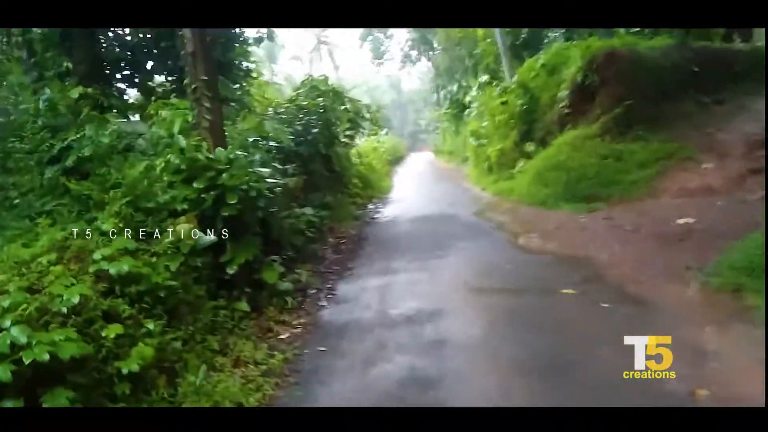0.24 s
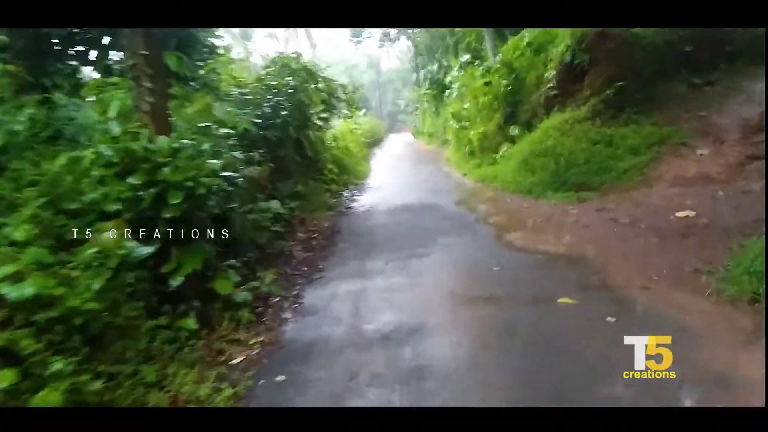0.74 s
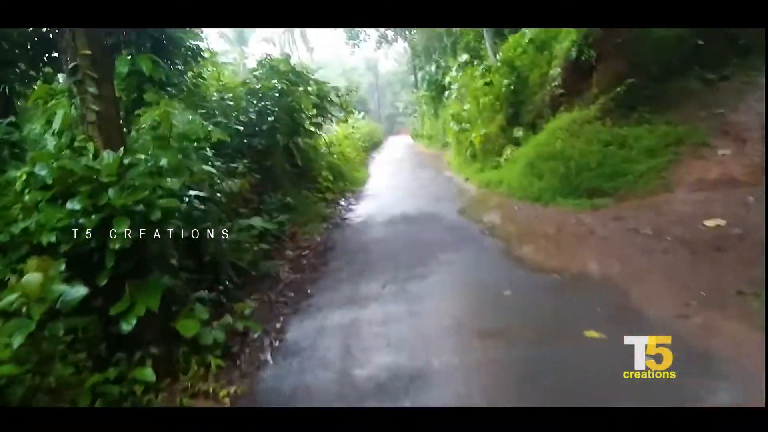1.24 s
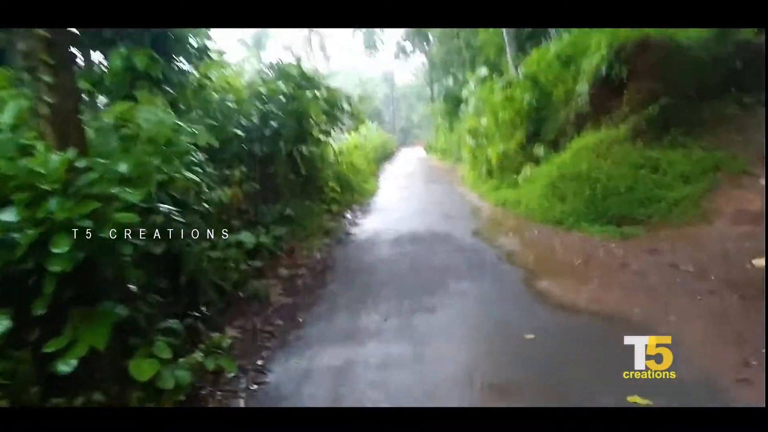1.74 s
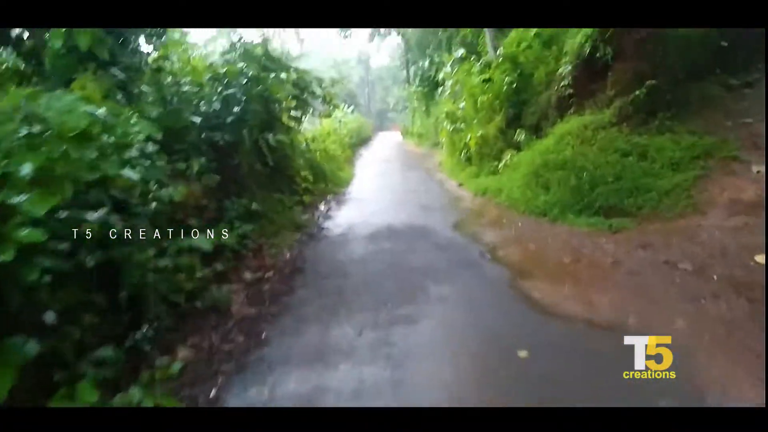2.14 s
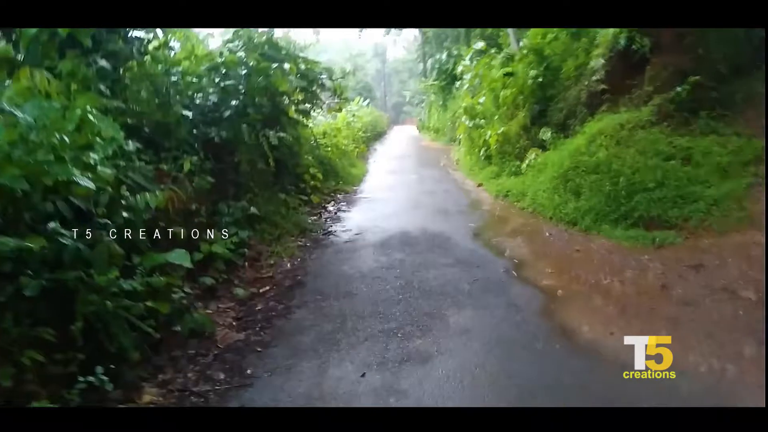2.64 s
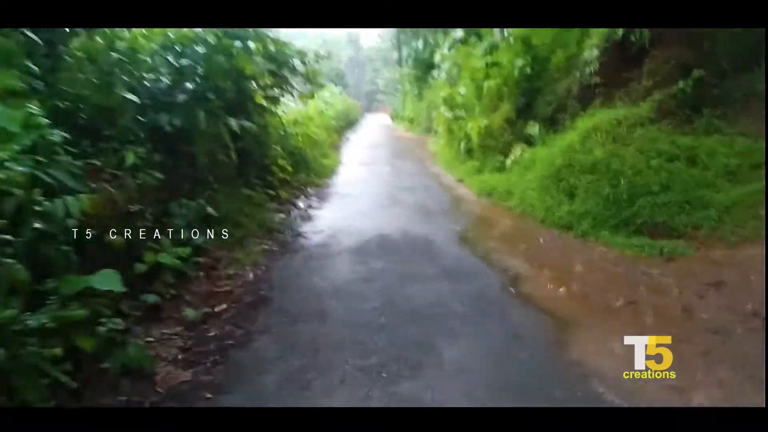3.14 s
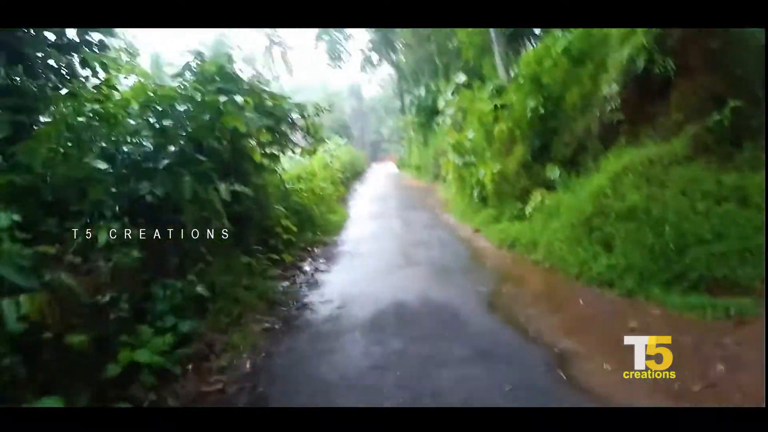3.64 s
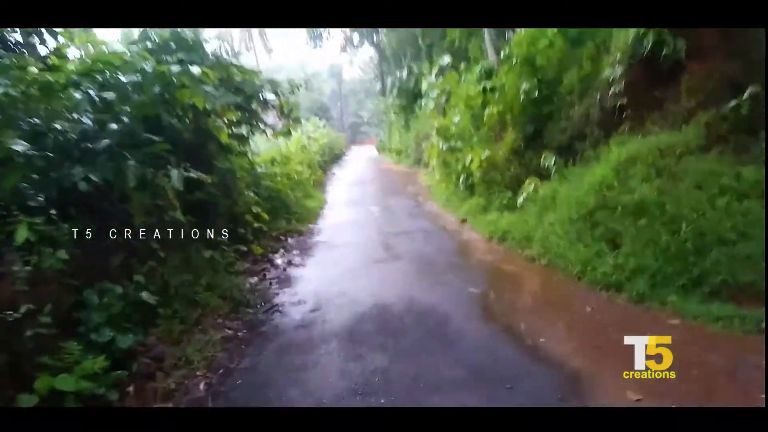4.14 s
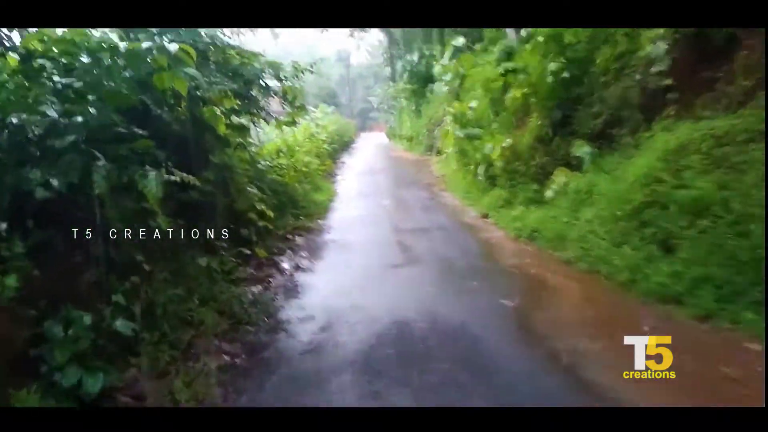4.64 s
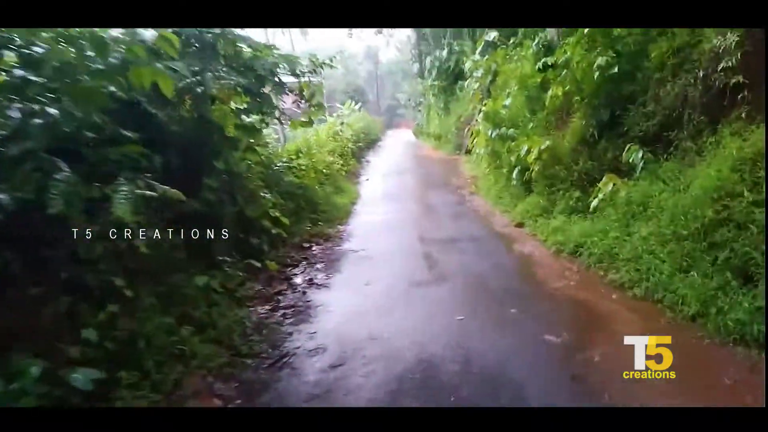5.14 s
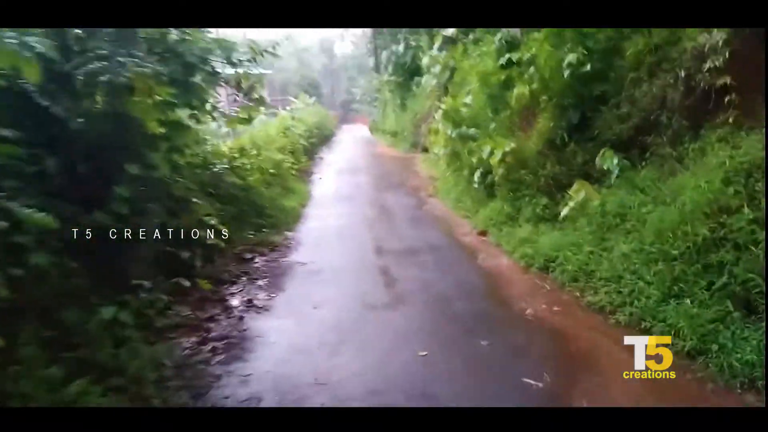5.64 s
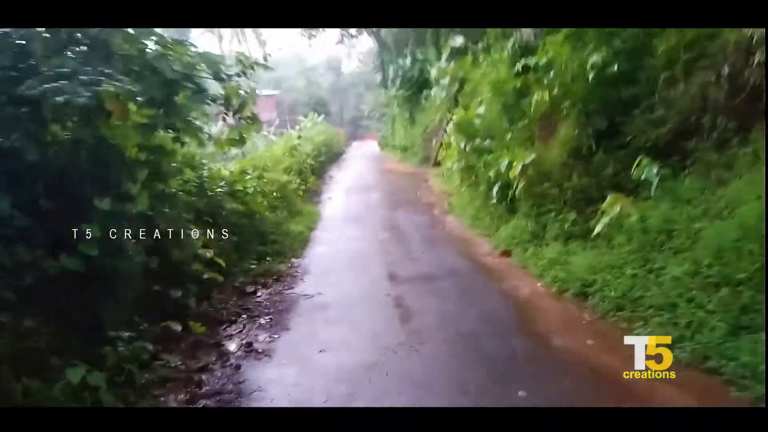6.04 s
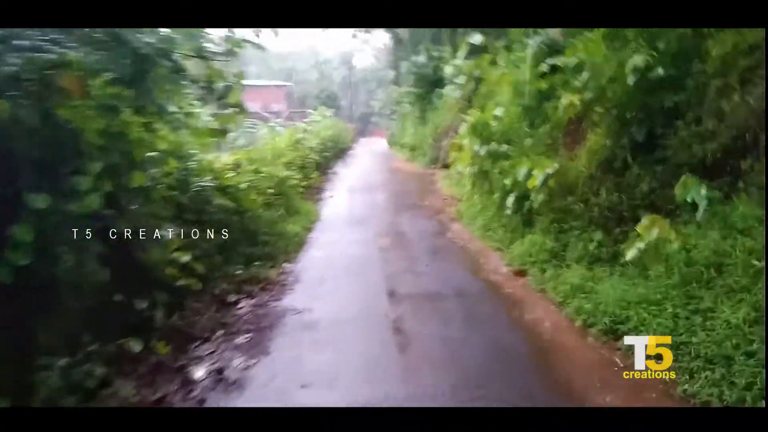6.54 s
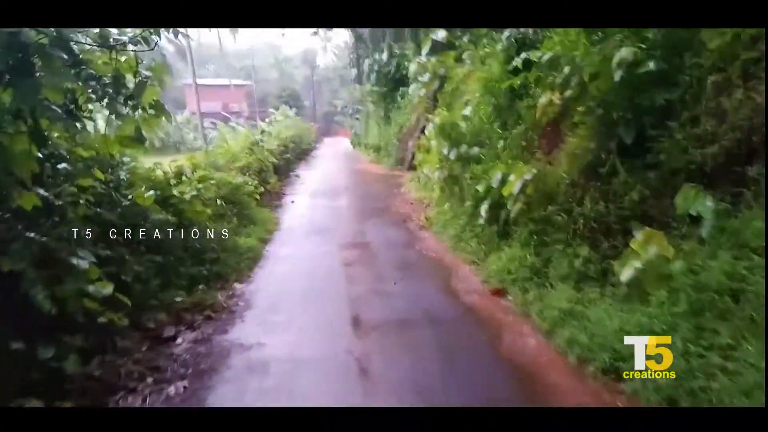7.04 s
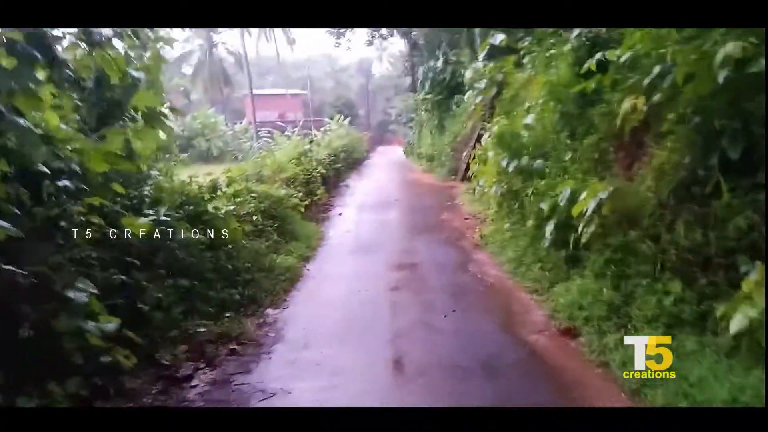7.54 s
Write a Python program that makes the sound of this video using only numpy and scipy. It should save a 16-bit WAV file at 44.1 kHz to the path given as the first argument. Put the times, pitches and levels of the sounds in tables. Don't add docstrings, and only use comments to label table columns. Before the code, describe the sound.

Steady rain heard from under an umbrella on a wet, leafy lane. A continuous broad hiss of distant rain lies behind dense fine patter. Close drops strike the cloth at random: dull thumps, short papery taps, sharp ticks, bright spits and occasional watery plunks. It eases slightly in the middle and thickens near the end. A small close microphone gives a slightly squashed sound with muted top treble.

```python
import sys
import numpy as np
from scipy import signal
from scipy.fft import rfft, irfft
from scipy.io import wavfile
from scipy.ndimage import uniform_filter1d, minimum_filter1d

SR = 44100
rng = np.random.default_rng(int(sys.argv[2]) if len(sys.argv) > 2 else 0)


def boost(x):
    u = np.asarray(x, float) / 20
    return 10 ** u


def unload_wav(signal):
    wavfile.write(
        sys.argv[1],
        SR,
        np.round(np.clip(np.atleast_2d(signal).T, -1, 1) * 32767).astype(np.int16),
    )


N = 343980
GRAIN = 400


def band_pass(x, hz, width_hz):
    return signal.lfilter(*signal.iirpeak(hz, hz / width_hz, fs=SR), x)


def high_pass(x, order, hz):
    return signal.sosfilt(signal.butter(order, hz, "high", fs=SR, output="sos"), x)


def colour(x, points):
    hz, db = np.transpose(points)
    f = np.arange(1, N // 2 + 2) * SR / N
    return irfft(rfft(x) * boost(np.interp(np.log(f), np.log(hz), db)), N)


def walk(rate_hz):
    hold = int(SR / rate_hz)
    steps = np.repeat(rng.standard_normal(N // hold + 1), hold)
    return 1.2 * uniform_filter1d(uniform_filter1d(steps, hold), hold)[:N]


def scatter(time_s, grains):
    at = np.clip(time_s * SR, 0, N).astype(int)[:, None] + np.arange(GRAIN)
    return np.bincount(at.ravel(), grains.ravel(), N + GRAIN)[:N]


# (time [s], level over the mean [dB])
SWELL = [(0, 1), (.3, 1), (.42, .5), (1.19, -0.5), (1.84, -.5), (2.22, -2), (2.89, -0.5), (3.37, -0.5),
         (3.5, 0), (4.21, -0.5), (4.67, -2), (5.41, -0.5), (5.93, -1), (6.73, 0), (7.15, 0.5), (7.45, 3),
         (7.69, 2.5), (7.8, 1.5)]
# (mean level [dB], slope [dB per dB of swell])
LAYERS = [
    (-43.5, 1.8),
    (-29, 1.45),
    (-29, 0.25),
]


def swell_levels():
    swell_db = np.interp(np.arange(N) / SR, *np.transpose(SWELL))
    return [mean_db + slope * swell_db for mean_db, slope in LAYERS]


# (frequency [Hz], level per Hz [dB])
FAR_SPECTRUM = [(18, -36), (30, -19), (108, -2), (307, -5), (569, 4.5), (783, -7.5), (1030, -4),
                (1660, 3.5), (5090, -2.5), (7000, -2)]


def far_rain(low_db, leaf_db, fine_db):
    total, shared = 0, walk(14)
    layers = ((low_db - 1.5, 40, 4.2), (leaf_db - 3.5, 800, 2.3), (fine_db + 2.0, 4000, 2.1))
    for level_db, low_hz, octaves in layers:
        group = 0
        for hz in low_hz * 2 ** np.arange(0, octaves, 1 / 3):
            sway_db = 1.3 * shared + 0.88 * walk(20)
            band = band_pass(rng.standard_normal(N), hz, hz / 3)
            group = group + boost(sway_db) * band_pass(band, hz, hz / 3)
        group = colour(group, FAR_SPECTRUM)
        total = total + group / group.std() * boost(level_db)
    return total


def drops(time_s, thump_db, ring_db, ring_hz, splash_db, splash_hz,
          thump_hz=640, spread_s=0.0032, burst_s=0.00045, ring_s=0.00099):
    t = np.arange(GRAIN) / SR
    chance = np.clip(rng.standard_normal((len(time_s), 4)), -1.5, 1.5)
    noise = rng.standard_normal((len(time_s), GRAIN))
    small, tail, pair, late = boost(chance * [2.35, 3.4, 1.28, 1.9]).T[:, :, None]

    age = t * small
    cycles = thump_hz * spread_s * (1 - np.exp(-age / spread_s))
    thump = np.sin(2 * np.pi * cycles) * (np.exp(-(age / 0.0012) ** 2) + 0.2 * np.exp(-age / 0.0024))
    flipped = noise[:, ::-1]
    wobble = uniform_filter1d(flipped, size=40) - uniform_filter1d(flipped, size=150)
    thump = thump + 1.3 * wobble * (1 - np.exp(-t / 0.0018)) * np.exp(-t / 0.0042)

    turn = 2 * np.pi * ring_hz[:, None] * t
    modes = np.sin(turn) + 0.38 * np.sin(turn * 1.587 * pair)
    ring = modes * (1 - np.exp(-t / 0.00012)) * np.exp(-t / (ring_s * tail))
    flick = t / 0.00011
    ring = ring + 2.2 * flick * (2 - flick) * np.exp(-flick)
    ring = ring + 0.38 * noise[::-1] * np.exp(-t / 0.0032)

    burst = t / (burst_s * late)
    shape = boost(splash_db)[:, None] * (burst * np.exp(1 - burst) + 0.1 * np.exp(-t / 0.0052))
    rough = 0.24 + 1.34 * uniform_filter1d(noise, size=5)
    splash = scatter(time_s, shape * rough * np.sin(2 * np.pi * splash_hz[:, None] * t))
    mist = scatter(time_s, shape * noise)
    mist = boost(-3.0) * band_pass(mist, 6800, 3500) + boost(-5) * band_pass(mist, 17000, 5300)

    dents = high_pass(scatter(time_s, boost(thump_db + 0.8)[:, None] * thump), 2, 85)
    cloth = signal.lfilter([0.6], [1, -0.4], scatter(time_s, boost(ring_db + 4.0)[:, None] * ring))
    return dents + cloth + splash + mist


def patter(low_db, leaf_db, fine_db, count=5000):
    when, size, tone, pitch, *tilt = rng.random((count, 7)).T
    at = (when * (N - 1)).astype(int)
    size_db = -3.2 * np.log(1 - 0.95 * size)
    thump_db = low_db[at] + size_db + 8 * tilt[0] - 3.5
    ring_db = leaf_db[at] + size_db + 8 * tilt[1] - 8.5
    splash_db = fine_db[at] + size_db + 8 * tilt[2] - 2.0
    ring_hz, splash_hz = 950 * 4.53 ** tone, 4300 * 3.1 ** pitch
    return drops(when * N / SR, thump_db, ring_db, ring_hz, splash_db, splash_hz, burst_s=0.00023)


def swings(table, cycles, rough):
    time_s, db, hz = np.transpose(table)
    turns = hz[:, None] * np.arange(GRAIN) / SR
    uneven = 1 + rough * uniform_filter1d(rng.standard_normal((len(time_s), GRAIN)), size=9)
    age = turns / cycles
    swell = age * np.exp(1 - age)
    return scatter(time_s, boost(db)[:, None] * uneven * swell * np.sin(2 * np.pi * turns))


# (time [s], level [dB], pitch [Hz])
DENTS = [(0.0454, -22, 400), (0.7027, -24, 300), (0.9644, -20, 250), (1.1734, -23, 460), (1.2687, -23, 330),
         (1.3167, -22, 440), (1.4659, -29, 420), (1.5457, -26, 700), (1.8474, -22, 480), (2.3912, -22, 410),
         (2.4161, -30, 390), (2.4654, -22, 400), (2.6054, -14, 380), (2.838, -14, 390), (3.0728, -23, 390),
         (3.3769, -21, 360), (3.464, -26, 450), (3.5767, -16, 480), (3.843, -19, 520), (3.9301, -23, 330),
         (4.9245, -20, 500), (5.3141, -13, 700), (5.4406, -22, 400), (5.587, -20, 380), (5.6731, -23, 450),
         (5.6914, -22, 470), (5.7249, -24, 400), (6.0446, -25, 560), (6.284, -22, 340), (6.8989, -22, 300),
         (7.0168, -28, 440), (7.0411, -13, 700), (7.2497, -19, 520), (7.3174, -27, 420), (7.3322, -28, 420),
         (7.3622, -22, 430), (7.384, -28, 470), (7.464, -23, 510), (7.5122, -31, 420), (7.5366, -29, 470),
         (7.5906, -20, 430), (7.6171, -18, 400), (7.6723, -27, 430), (7.7272, -22, 470), (7.767, -27, 470)]
# (time [s], level [dB], pitch [Hz])
PLOPS = [(0.0683, -16, 2250), (0.1039, -14, 1520), (0.1132, -13, 1780), (0.1691, -17, 1450),
         (0.1788, -17, 1290), (0.2053, -16, 1170), (0.2167, -16, 1710), (0.2447, -18, 2580),
         (0.3027, -16.5, 1060), (0.3555, -23, 1040), (0.6729, -14, 1530), (0.909, -20, 1730),
         (0.9644, -17, 1120), (1.2684, -7, 2810), (1.2878, -17, 1640), (1.3657, -14, 1730),
         (1.5461, -16, 1680), (1.6519, -16, 1630), (1.6592, -14, 2520), (1.6695, -19, 1590),
         (1.8795, -16, 1580), (2.465, -12, 2730), (2.8899, -17, 1660), (3.0972, -16, 1530),
         (3.2609, -16, 1090), (3.5763, -17, 1570), (3.7087, -13, 1720), (3.7195, -21, 2540),
         (3.7324, -19, 1720), (3.8435, -17, 1310), (3.9714, -17, 1810), (4.4075, -15, 2130),
         (4.4136, -18, 2140), (4.8455, -20, 1800), (4.9251, -16, 2050), (4.9793, -15, 1480),
         (5.2111, -27, 1520), (5.5533, -18, 1670), (5.5849, -20, 1440), (5.607, -18, 1390),
         (5.9602, -14, 2830), (6.0995, -16, 2000), (6.3501, -12, 2330), (6.5388, -14, 2270),
         (6.579, -15, 1510), (6.9156, -15, 1200), (6.9267, -18, 2190), (7.0441, -11, 1600),
         (7.0501, -14, 2270), (7.0704, -21, 2370), (7.1424, -14, 2220), (7.2212, -16, 1510),
         (7.2713, -14, 1590), (7.2956, -16, 1360), (7.3283, -14, 1560), (7.3737, -14.5, 1210),
         (7.4276, -15, 1770), (7.5367, -19, 1050), (7.6001, -11, 1000), (7.6898, -12.5, 1180)]
# (time [s], level [dB], pitch [Hz])
SPITS = [(0.0696, -19, 6180), (0.3032, -22, 7080), (0.5117, -20, 6600), (0.7432, -16, 6460),
         (0.9588, -27, 6240), (1.2615, -13, 5700), (1.7856, -15, 6050), (1.8713, -17, 4660),
         (2.1094, -12, 7300), (2.3472, -16, 6770), (2.3514, -19, 4660), (2.5545, -13, 4750),
         (2.5956, -15, 6460), (3.0661, -20, 6120), (3.4693, -11, 5160), (3.5799, -19, 6550),
         (3.7374, -23, 5600), (3.9162, -17, 5880), (3.957, -16, 7400), (4.6414, -10, 8670),
         (5.0144, -17, 6540), (5.3148, -13, 7570), (5.3779, -4, 4140), (5.4163, -19, 6400),
         (5.5105, -20, 4050), (5.5537, -17, 6010), (5.9608, -15, 6460), (6.0999, -22, 5640),
         (6.1372, -18, 5700), (6.2172, -14.5, 4530), (6.8448, -18, 6230), (6.9268, -18, 5260),
         (7.3322, -19, 5280), (7.4428, -16, 4700), (7.6766, -18, 7060), (7.7137, -17, 7440)]


def medium_drops():
    dents = swings(DENTS, cycles=0.41, rough=0.3)
    plops = swings(PLOPS, cycles=0.75, rough=1.3)
    spits = swings(SPITS, cycles=1.7, rough=1.8)
    return dents + 1.12 * plops + 1.5 * spits


def splash_pitch_hz(time_s):
    return 5900 * 1.3 ** rng.random(len(time_s))


# (time [s], ring [dB], ring [Hz], splash [dB])
TICKS = [(0.1995, -13, 1530, -15), (0.2466, -24, 2560, -12), (0.498, -16, 2840, -9),
         (1.0798, -15.5, 2580, -11), (1.3655, -16, 3800, -8), (1.669, -10, 4480, -11),
         (1.9544, -16.5, 1210, -12), (2.343, -9, 1390, -4), (2.752, -17, 1720, -9),
         (3.7039, -7.5, 3340, -2), (3.7367, -10, 1460, -7), (4.457, -5.5, 2570, -4), (4.539, -9, 1610, -10),
         (4.867, -15, 2270, -3), (5.3841, -11, 1760, -11), (5.563, -15, 1380, -9),
         (5.7793, -16, 1910, -10.5), (6.5793, -14, 1590, -14), (6.621, -12, 2300, -11),
         (6.793, -9, 1450, -2), (6.845, -15, 2240, -18), (7.359, -12, 1900, -15), (7.53, -25, 4100, -5),
         (7.545, -16, 1380, -11), (7.5612, -26, 1670, -2), (7.5863, -12, 1540, -3), (7.598, -10, 1940, -1),
         (7.612, -26, 3660, -3), (7.6678, -7, 3160, -13), (7.7907, -11, 1750, -11)]


def ticks():
    time_s, *ring_and_splash = np.transpose(TICKS)
    thump_db = np.full(len(time_s), -20)
    return drops(time_s, thump_db, *ring_and_splash, splash_pitch_hz(time_s), ring_s=0.0011)


# (time [s], peak [dB])
MIST = [(0.3381, -8), (0.4648, -8), (0.7422, -7), (0.9577, -9), (0.9852, -6), (1.2625, -16), (1.4895, -26),
        (1.725, -8), (2.796, -8), (3.2675, -11), (3.3952, -23), (3.8911, -13), (4.324, -8), (4.4263, -10),
        (4.641, -5), (4.6673, -13), (5.106, -2), (5.2026, -10), (5.4151, -4), (5.5333, -11), (6.0227, -24),
        (6.0586, -9), (6.5435, -10), (6.5779, -14), (6.686, -20), (6.757, -25), (7.0354, -32),
        (7.1636, -12), (7.5033, -18), (7.7737, -15)]


def mist_bursts():
    time_s, db = np.transpose(MIST)
    age = np.arange(GRAIN) / SR / 0.001
    noise = rng.standard_normal((len(time_s), GRAIN))
    puffs = boost(db + 0.5)[:, None] * age * np.exp(1 - age) * noise
    return band_pass(band_pass(scatter(time_s - 0.0005, puffs), 15700, 8600), 16000, 11500)


# (time [s], level [dB], pitch [Hz])
CRACKS = [(.4957, -11, 3580), (1.2622, -14.5, 4040), (2.3412, -7.5, 2550), (2.3428, -17, 3600),
          (2.423, -23, 3530), (2.7262, -20, 2660), (4.4568, -35, 3500), (5.2468, -9, 4170),
          (6.7415, -5, 4200), (6.7582, -15, 4300), (6.7942, -12, 4600), (6.801, -12, 4570),
          (1.3716, -14, 4000), (5.7134, -20, 2960), (7.0098, 3, 4100), (7.667, -1, 4260)]


def cracks():
    return band_pass(swings(CRACKS, cycles=0.82, rough=2.7), 2900, 6500)


# (time [s], thump [dB])
DULL = [(0.5115, -14.5), (0.6725, -20), (0.936, -12.5), (1.158, -18), (1.415, -14), (1.579, -14),
        (1.786, -14), (1.8887, -18), (2.095, -21), (2.814, -14), (2.8262, -16), (2.99, -13.5),
        (3.0597, -20), (3.12, -14.5), (3.3402, -18), (3.916, -20), (4.3912, -13), (4.7857, -17),
        (5.554, -16), (5.851, -12.5), (6.285, -29), (6.4623, -17), (6.678, -16), (6.8916, -13),
        (6.905, -15), (6.928, -18), (7.34, -16), (7.432, -15), (7.691, -18), (7.701, -16)]


def dull_drops():
    time_s, thump_db = np.transpose(DULL)
    ring_hz = 1200 * 2.21 ** rng.random(len(time_s))
    return drops(time_s, thump_db, thump_db - 3.5, ring_hz, thump_db - 4, 2.5 * ring_hz)


# (time [s], thump [dB], ring [dB], ring [Hz], splash [dB])
BURSTING = [(1.4903, -10.5, -17, 1660, -2), (1.646, -13, -14, 1690, -6), (1.8556, -10, -11.5, 1300, -2.5),
            (2.109, -5.5, -10.5, 1650, -23), (2.5584, -10, -8, 1670, -6), (2.6129, -8, -11, 1290, -10),
            (2.7264, -11, -9, 1580, 1), (3.3962, -7, -13.5, 1170, -1.5), (3.4533, -5.5, -11, 1380, 0),
            (3.4827, -13, -7.5, 990, -12), (3.5706, -9, -14, 1570, -5.5), (3.7877, -6.5, -11, 1830, -9),
            (3.8644, -5.5, -6, 1460, -2), (4.6682, -11, -9.5, 1370, -2), (5.304, -15, -16, 900, -3.5),
            (5.3345, -14, -13, 1000, -6), (6.037, -9, -7.5, 1070, -8), (6.5578, -10, -10, 1010, -13),
            (6.6883, -13, -8.5, 1250, -1), (6.6984, -5, -11, 1210, -13), (6.719, -12, -7.5, 1020, -8),
            (6.758, -11, -11, 900, -11), (6.8, -9, -12, 1700, -11), (7.037, -10, -10, 1680, -6),
            (.743, -9, -8.5, 2200, -21), (1.179, -7, -14, 2800, -6.5), (1.262, -13.5, -12, 2140, -5.5),
             (1.6794, -10.5, -6, 2640, 0), (1.7678, -5, -6, 1940, 2), (2.4223, -3, -9.5, 2260, -4),
             (2.5177, -3, -8.5, 2200, -10), (2.583, -8, -10, 2200, -4), (3.276, -13, -13, 1960, -2),
             (4.0763, -10, -8, 1950, -6), (4.2267, -10, -14, 4230, 1), (4.524, -6, -7, 2860, -6),
             (5.247, -14, -7, 2100, -3), (5.505, -11, -3, 3480, -11), (5.602, -7, -14, 3010, -9),
             (5.714, -9.5, -4.5, 2640, -2), (5.922, -12, -5, 1860, -9), (6.0237, -8, -12, 2150, -1),
             (6.4825, -8, -13, 2500, -9), (6.7417, -4.5, -6, 1940, -13), (7.01, -4, -10, 3060, -20),
             (7.2017, -11.5, -5.5, 3060, -6), (7.355, -8, -17, 2450, 0), (7.781, -18, 0, 4300, -10)]


def bursting_drops():
    time_s, *parts = np.transpose(BURSTING)
    return drops(time_s, *parts, splash_pitch_hz(time_s))


# (time [s], thump [dB], ring [dB], ring [Hz])
SWALLOWED = [(0.788, -9.5, -25, 930), (1.0417, -10, -19, 1210), (1.1199, -5, -8, 1410),
             (1.173, -33, -15.5, 1630), (1.3719, -6, -11, 1810), (2.025, -5, -17, 1650),
             (2.0344, -14, -10, 1160), (2.5059, -8, -15, 1430), (2.599, -13, -13, 1530),
             (2.6327, -11, -15, 1820), (2.843, -7.5, -12, 1220), (3.066, -11, -18, 1370),
             (3.141, -9.5, -19, 1580), (3.3471, -5, -9, 1190), (3.617, -22, -11, 1880),
             (3.6625, -15, -14, 1320), (4.0087, -16, -13, 1920), (5.191, -8.5, -12, 1190),
             (5.315, -35, -9, 1300), (5.4009, -10.5, -17, 1720), (5.5773, -17, -17, 1050),
             (5.7008, -34, -13, 1770), (6.2671, -6, -14, 1630), (6.3184, -15, -10, 1810),
             (6.8817, -12, -9, 1180), (6.9392, -7, -5.5, 1750), (7.307, -11.5, -8, 1800),
             (7.3733, -32, -28, 1210), (7.7663, -33, -12, 1110),
             (0.814, -13.5, -14, 4480), (1.017, -7.5, -6.5, 2300), (1.6596, -10.5, -16, 2600),
              (1.8649, -6, -11, 2700), (1.8708, -8, -9, 1990), (1.934, -10, -9, 2370),
              (2.5254, -11, -13, 2430), (2.5736, -11, -11, 1890), (2.8392, -24, -7.5, 2470),
              (3.9223, -7.5, -14, 1850), (3.9572, -5.5, -6.5, 2390), (4.5653, -5.5, -8, 1950),
              (4.706, -10, -13, 3260), (4.723, -4.5, -8.5, 1980), (5.378, -10.5, -13, 3800),
              (5.5109, -9.5, -16, 2220), (5.594, -7, -3.5, 2160), (5.7557, -10, -19, 2000),
              (5.8264, -17, -9.5, 3920), (6.2164, -12.5, -17, 2600), (6.2705, -10, -5, 2590),
              (6.3056, -7, -5.5, 4280), (6.3258, -11, -9, 3030), (6.5465, -13, -12.5, 2280),
              (6.7776, -3.5, -7, 2300), (7.022, -30, -10, 2250), (7.076, -7, -9, 2300),
              (7.266, -2.5, -8, 2100), (7.72, -12, -14, 3570), (7.775, -31, -9, 3400)]


def swallowed_drops():
    time_s, *parts = np.transpose(SWALLOWED)
    splash_db = -34 + 6 * np.minimum(rng.standard_normal(len(time_s)), 0.7)
    return drops(time_s, *parts, splash_db, splash_pitch_hz(time_s))


# (time [s], splash [dB], splash [Hz])
SPRAY = [(.9591, -11, 8800), (.9862, -7, 9500), (1.655, -6, 6200), (1.675, -3, 6160), (2.33, -5, 6260),
         (2.7414, -3.5, 4280), (3.043, -6, 6240), (3.2973, -9, 6700), (3.8164, -2, 6360),
         (3.8907, -4.5, 7950), (4.2906, -4.5, 7200), (4.324, -17, 8900), (4.337, -4, 5970),
         (4.427, 8, 7500), (4.679, -7, 6100), (4.996, -3, 8600), (5.057, -3, 4360), (5.106, -10, 11300),
         (5.151, -9, 10900), (5.221, -9, 6760), (5.4156, -23, 6240), (5.4238, -6, 6870), (5.44, -7, 7200),
         (5.535, -10, 6200), (6.616, -2, 5100), (7.165, -5, 7900), (7.242, -8, 7350), (7.48, -3, 7260),
         (7.504, -7, 6900), (7.523, -8, 5900)]


def shattering_drips():
    time_s, db, hz = np.transpose(SPRAY)
    return drops(time_s, db - 46, db - 54, hz * 0.49, db - 4, hz, burst_s=0.00055)


# (time [s], level [dB], pitch [Hz])
POCKETS = [
    (1.7676, -4, 2170),
    (2.3408, -12, 1170),
    (2.3412, -24, 600),
    (3.9575, -13, 1030),
    (4.0088, -7, 1850),
    (4.5655, -18, 1950),
    (4.8668, -0.5, 2150),
    (5.378, 0, 3780),
    (5.5049, -16, 3520),
    (6.7937, -5, 2150),
]


def water_pockets():
    return swings(POCKETS, cycles=1.2, rough=0.56)


# (delay [s], level [dB])
GROUND = (.0073, -20)
# (centre [Hz], width [Hz], share [1])
HOLLOW = (780, 236, 0.47)


def under_canopy(near):
    delay_s, echo_db = GROUND
    near = near + boost(echo_db) * band_pass(np.roll(near, int(delay_s * SR)), 570, 2300)
    hz, width_hz, share = HOLLOW
    return near - share * band_pass(near, hz, width_hz)


def scene():
    levels = swell_levels()
    far = far_rain(*levels)
    near = patter(*levels) + medium_drops() + ticks() + mist_bursts() + cracks() + dull_drops()
    near = near + bursting_drops() + swallowed_drops() + shattering_drips() + water_pockets()
    return (under_canopy(near) + far)[None]


def limiter(x, top_db=-11, share=0.15, look_s=0.002):
    k = max(int(look_s * SR), 2)
    peak = -minimum_filter1d(-np.abs(x), 2 * k)
    gain = np.minimum(boost(top_db) / (peak + 1e-9), 1) ** share
    return x * uniform_filter1d(gain, k)


def low_pass(x):
    return signal.sosfilt(signal.butter(12, 17000, fs=SR, output="sos"), x)


# (frequency [Hz], level [dB])
MIC = [(7600, -0.5), (8600, -5.5), (10100, -8), (10500, -11.5), (15600, -15)]
# (frequency [Hz], level [dB])
BAND_LIMIT = [(15720, 0), (15790, -14), (15900, -36), (16500, -42), (16700, -62)]


def record(dry):
    x = limiter(high_pass(dry, 3, 75))
    x = np.tanh(1.274 * x) / 1.096
    x = colour(colour(x, MIC), BAND_LIMIT)
    return low_pass(x)


dry = scene()
out = record(dry)
unload_wav(out)
```